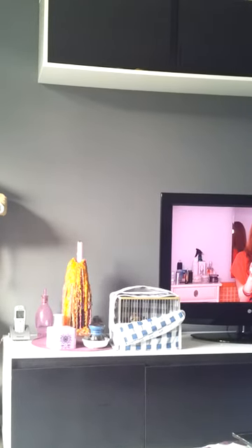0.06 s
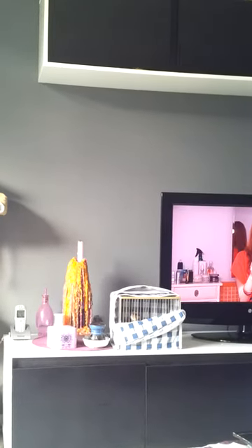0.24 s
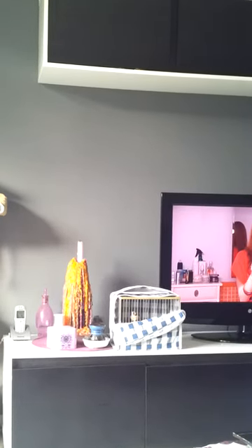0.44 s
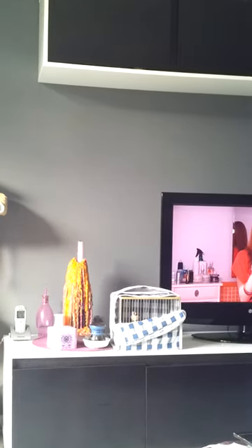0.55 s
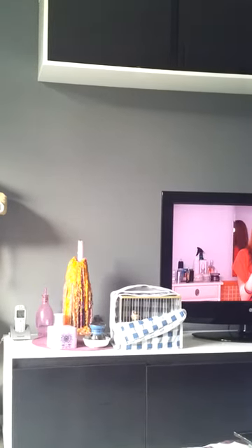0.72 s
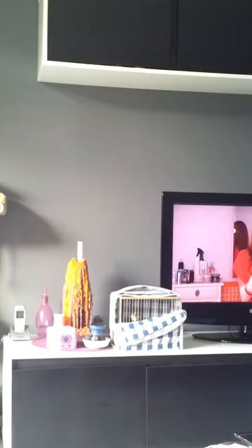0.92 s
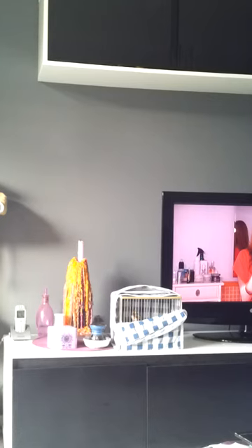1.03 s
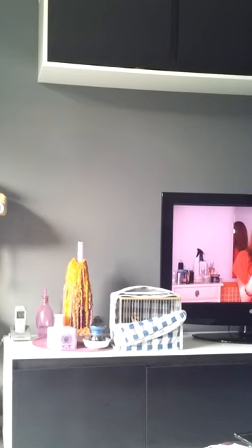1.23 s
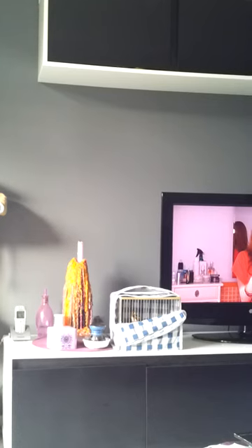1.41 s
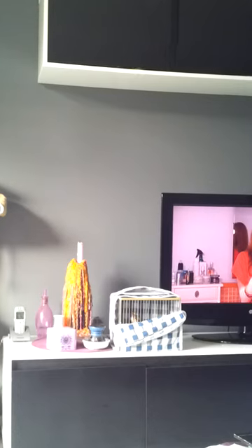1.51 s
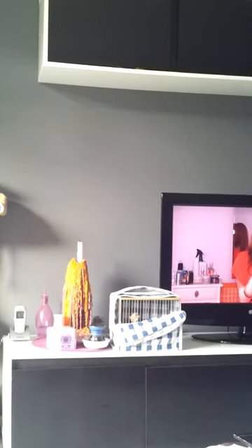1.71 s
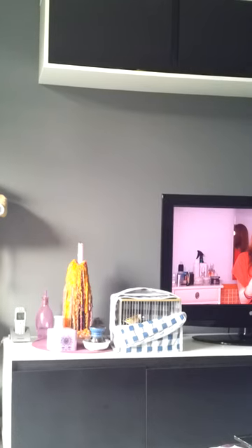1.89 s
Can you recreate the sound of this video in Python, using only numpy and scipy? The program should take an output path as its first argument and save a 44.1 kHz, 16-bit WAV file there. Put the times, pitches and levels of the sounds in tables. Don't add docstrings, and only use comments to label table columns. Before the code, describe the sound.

A small caged finch sings one rapid phrase of high whistles, sweeps and buzzy chirps, heard from across a hard-walled living room by a distant microphone; then a soft low knock over faint hiss and rumble.

```python
import sys
import numpy as np
from scipy import signal
from scipy.fft import rfft, irfft
from scipy.io import wavfile
from scipy.ndimage import uniform_filter1d

SR = 44100
rng = np.random.default_rng(int(sys.argv[2]) if len(sys.argv) > 2 else 0)


def gain_from_decibels(decibels):
    exponent = np.asarray(decibels, float) / 20
    return 10 ** exponent


def wav_record(signal):
    frames = np.transpose(np.atleast_2d(signal))
    bounded = np.clip(frames, -1, 1)
    quanta = np.round(bounded * 32767).astype(np.int16)
    wavfile.write(sys.argv[1], SR, quanta)


N = 85995


def evened(x):
    return x / np.sqrt(np.mean(x ** 2) + 1e-20)


def read(points, hz):
    f, value = np.transpose(points)
    return np.interp(np.log(hz + 1), np.log(f + 1), value)


def add(mix, start_s, sound):
    part = mix[round(start_s * SR):][:len(sound)]
    part += sound[:len(part)]


def band(centre_hz, width_hz):
    hz = np.fft.rfftfreq(N, 1 / SR)
    shape = np.exp(-((hz - centre_hz) / width_hz) ** 2)
    return evened(irfft(rfft(rng.standard_normal(N)) * shape, N))


def swell(u, rise, fall):
    ramp = np.minimum(u / rise, (1 - u) / fall)
    return np.sin(np.pi / 2 * np.clip(ramp, 0, 1)) ** 2


# frequency in Hz, density in dB per Hz.
HISS_SPECTRUM = [(30, 5), (46, -1), (120, -2.5), (210, -2), (400, -6), (700, -10.5), (2300, -15.5),
                 (11800, -22)]
# start in seconds, length in seconds, centre in Hz, width in Hz, level in dB.
RUSTLES = [
    (0.741, 0.36, 45, 25, -60),
    (1.374, .36, 1600, 1380, -64.5),
]


def room_tone():
    hiss_db, patch_db = -56.5, 1.43
    whine_hz, whine_width_hz, whine_db = 4850, 380, -71.5
    frames = N // 256 + 5
    hz = np.fft.rfftfreq(1024, 1 / SR)
    t = np.arange(N) / SR
    real, imag, patches = rng.standard_normal((frames, 513, 3)).T
    patches = uniform_filter1d(patches, size=12, axis=0)
    patches = evened(uniform_filter1d(patches, size=14, axis=1))
    spectrum = (real + 1j * imag) * gain_from_decibels(read(HISS_SPECTRUM, hz)[:, None] + patch_db * patches)
    hiss = signal.istft(spectrum, nperseg=1024, noverlap=768)[1][:N]
    out = gain_from_decibels(hiss_db) * evened(hiss)
    out += gain_from_decibels(whine_db) * band(whine_hz, whine_width_hz)
    for start_s, length_s, centre_hz, width_hz, db in RUSTLES:
        shape = swell((t - start_s) / length_s, 0.093, 0.43)
        out += gain_from_decibels(db) * shape * band(centre_hz, width_hz)
    return out


def finch():
    throat_hz = 2120
    out = duet()
    for voice in (whistles, sweeps, buzzes):
        out += voice()
    throat = signal.butter(N=6, Wn=throat_hz, btype="high", fs=SR, output="sos")
    return signal.sosfilt(throat, out)


# frequency in Hz, T60 in seconds.
ROOM_T60 = [(2000, 0.71), (3000, 0.64), (4200, 0.6), (6000, 0.69), (8000, 0.57), (11000, 0.46)]


def room(x):
    room_db, early_db, early_s, gap_s = 4, 0, 0.025, 0.0015
    taps = np.zeros(SR)
    slots = np.arange(0, SR - 20, 20)
    taps[slots + rng.integers(0, 20, len(slots))] = 1
    taps *= rng.choice([-1.0, 1.0], SR)
    hz, t, z = signal.stft(taps, SR, nperseg=256)
    decay = gain_from_decibels(-60 * t / read(ROOM_T60, hz)[:, None])
    tail = signal.istft(z * decay, SR, nperseg=256)[1]
    t = np.arange(len(tail)) / SR
    early = 1 + gain_from_decibels(early_db) * np.exp(-t / early_s)
    onset = np.clip(t / gap_s - 1, 0, 1)
    tail = tail / np.linalg.norm(tail) * early * onset
    return x + gain_from_decibels(room_db) * signal.fftconvolve(x, tail)[:N]


# start in seconds, length in seconds, from Hz, to Hz, level in dB.
VOICE_SIDES = [
    (.21, 0.038, 5970, 5038, -27),
    (0.219, 0.029, 5510, 6414, -35.5),
]
# multiple of first side, multiple of second side, level in dB.
BEAT_TONES = [
    (-1, 2, -54),
    (1, 1, -57),
    (2, -1, -60.5),
    (2, 0, -57),
]


def duet():
    rise, fall, settle_s = 0.5, 0.15, 0.0055
    rasp_db, rasp_width_hz = 0, 400
    t, out = np.arange(N) / SR, np.zeros(N)
    phases, shapes = [], []
    for start_s, length_s, from_hz, to_hz, db in VOICE_SIDES:
        hz = to_hz + (from_hz - to_hz) * np.exp(-np.clip(t - start_s, 0, 1) / settle_s)
        phase = 2 * np.pi * np.cumsum(hz) / SR
        shape = swell((t - start_s) / length_s, rise, fall)
        out += gain_from_decibels(db) * shape * np.sin(phase)
        phases.append(phase)
        shapes.append(shape)
    for first, second, db in BEAT_TONES:
        rasp = 1 + gain_from_decibels(rasp_db) * band(0, rasp_width_hz)
        tone = np.sin(round(first) * phases[0] + round(second) * phases[1])
        out += gain_from_decibels(db) * shapes[0] * shapes[1] * rasp * tone
    return out


def note(length_s, from_hz, to_hz, db, settle, overtones_db, wobble, breath_db):
    u = np.arange(0, length_s, 1 / SR) / length_s
    way = (1 - np.exp(-u / settle)) / (1 - np.exp(-1 / settle))
    chance = rng.standard_normal((2, 4410))[:, :len(u)]
    drift = evened(uniform_filter1d(chance[0], size=60))
    hz = (from_hz + (to_hz - from_hz) * way) * (1 + wobble * drift)
    phase = 2 * np.pi * np.cumsum(hz) / SR
    tone = np.sin(phase)
    for harmonic, overtone_db in zip((2, 3), overtones_db):
        tone += gain_from_decibels(overtone_db) * np.sin(harmonic * phase)
    rasp = evened(uniform_filter1d(uniform_filter1d(chance[1], size=24), size=16))
    return gain_from_decibels(db) * swell(u, 0.12, 0.15) * tone * (1 + gain_from_decibels(breath_db) * rasp)


def sing(rows, *voice):
    out = np.zeros(N)
    for start_s, *row in rows:
        add(out, start_s, note(*row, *voice))
    return out


# start in seconds, length in seconds, from Hz, to Hz, level in dB.
WHISTLE_NOTES = [
    (0.355, 0.034, 3513, 4105, -32.5),
    (0.479, .052, 4153, 4691, -29.5),
    (0.723, 0.0605, 4274, 4080, -26.5),
]
WHISTLE_HARMONICS_DB = [-29, -27.5]


def whistles():
    return sing(WHISTLE_NOTES, 0.295, WHISTLE_HARMONICS_DB, 0.004, -24)


# start in seconds, length in seconds, from Hz, to Hz, level in dB.
SWEEP_NOTES = [
    (.456, 0.006, 1980, 2450, -52),
    (.458, 0.025, 2764, 3563, -39),
    (0.55, 0.02868, 2600, 3089, -37),
    (.57, 0.025, 2828, 3837, -33.5),
    (.692, 0.024, 2516, 4322, -34),
    (.752, 0.054, 7220, 7820, -47.5),
    (.785, 0.076, 2766, 2377, -46),
]
SWEEP_HARMONICS_DB = [-22.5, -32]


def sweeps():
    return sing(SWEEP_NOTES, 8.3, SWEEP_HARMONICS_DB, 0.011, -12)


# start in seconds, level in dB, pitch in Hz.
KNOCK_HITS = [
    (0.511, -49.5, 203),
    (0.678, -50, 203),
    (1.154, -37, 200.7),
    (1.302, -51.5, 221),
    (1.915, -52, 188.6),
]


def knocks():
    bump_s, ring_db, ring_t60_s = 0.031, -7, 0.33
    out, t = np.zeros(N), np.arange(0, 0.5, 1 / SR)
    bump = np.sin(np.pi * np.clip(t / bump_s, 0, 1)) ** 2
    ring = gain_from_decibels(ring_db - 60 * t / ring_t60_s) * np.clip(t / bump_s - 1, 0, 0.3) / 0.19
    for start_s, db, hz in KNOCK_HITS:
        add(out, start_s, gain_from_decibels(db) * (bump + ring) * np.sin(2 * np.pi * hz * t))
    return out


# start in seconds, length in seconds, from Hz, to Hz, level in dB.
BUZZ_NOTES = [
    (.655, 0.023, 2279, 3760, -40),
    (.657, 0.036, 3736, 5770, -37.5),
    (.679, 0.011, 4790, 7180, -40),
    (.688, 0.02, 5283, 6540, -38),
    (.752, 0.035, 10000, 11200, -56.5),
    (.79, 0.069, 3600, 3000, -45.5),
]


def buzzes():
    return sing(BUZZ_NOTES, 8.3, SWEEP_HARMONICS_DB, 0.04, -12)


def scene():
    return (room(finch()) + knocks() + room_tone())[None]


def band_limit(x):
    return signal.sosfilt(signal.butter(12, 12250, fs=SR, output="sos"), x)


def record(dry):
    edge_hz = 11950
    lowpass = signal.firwin(511, edge_hz, fs=SR)[None]
    dull = signal.oaconvolve(dry, lowpass, "same")
    return band_limit(dull)


dry = scene()
out = record(dry)
wav_record(out)
```